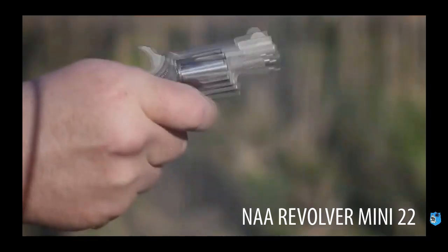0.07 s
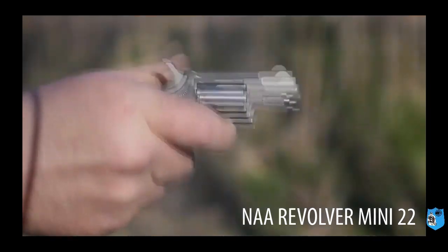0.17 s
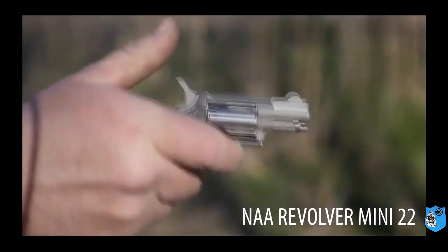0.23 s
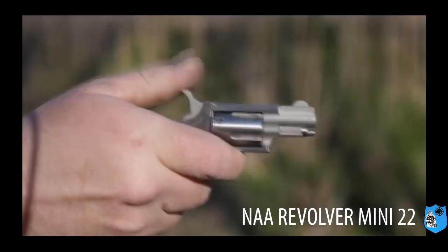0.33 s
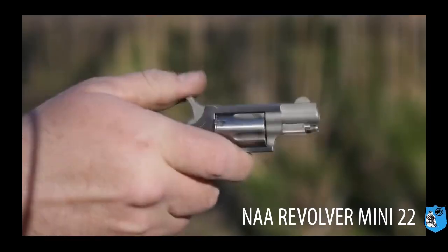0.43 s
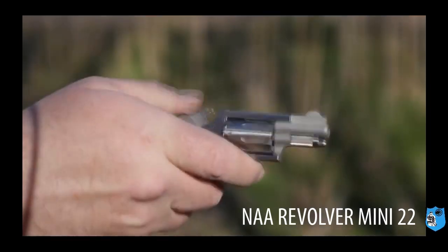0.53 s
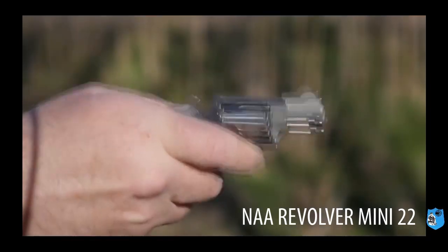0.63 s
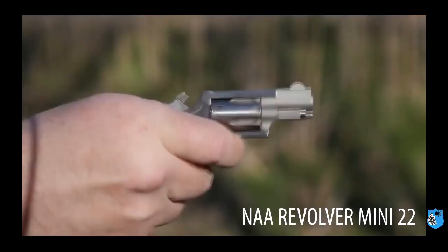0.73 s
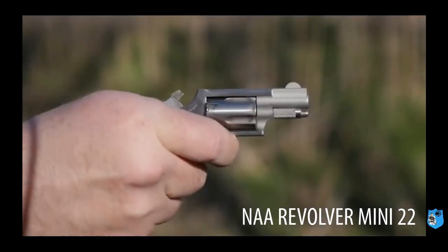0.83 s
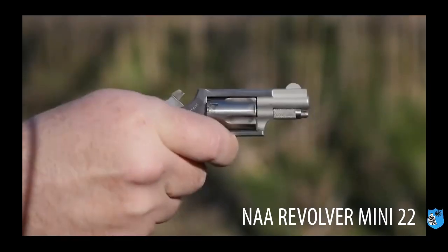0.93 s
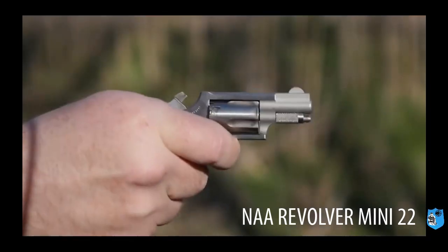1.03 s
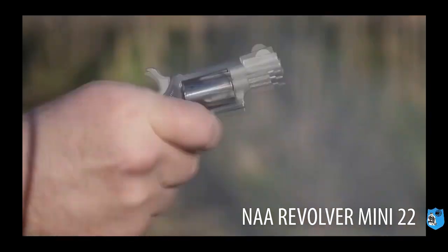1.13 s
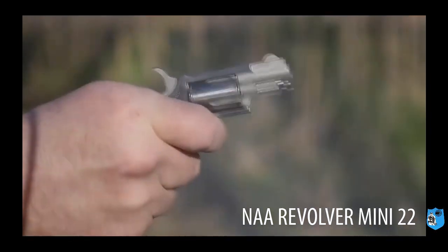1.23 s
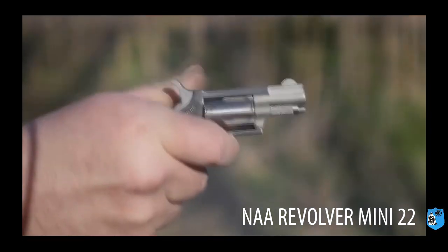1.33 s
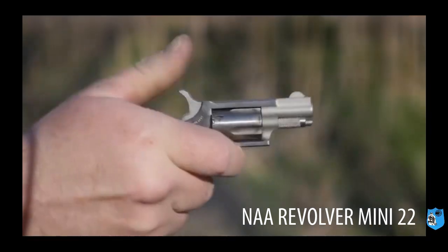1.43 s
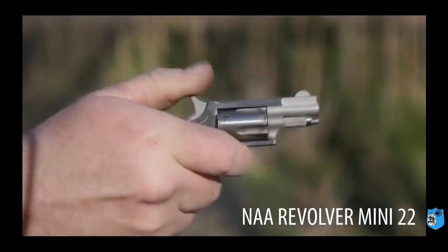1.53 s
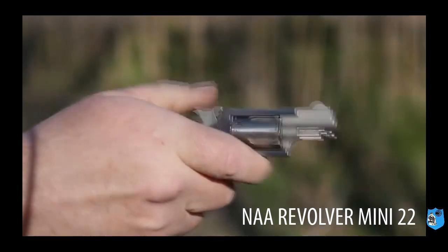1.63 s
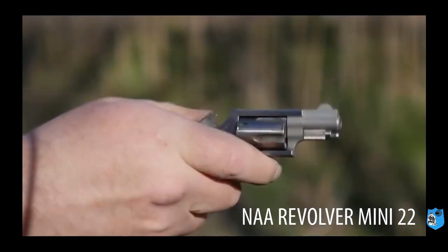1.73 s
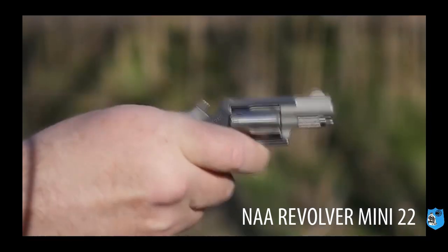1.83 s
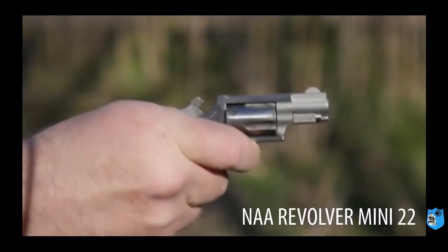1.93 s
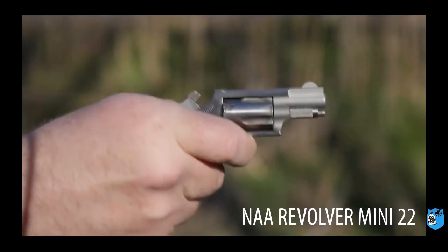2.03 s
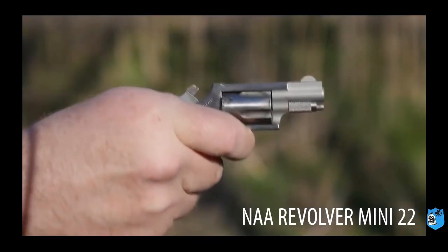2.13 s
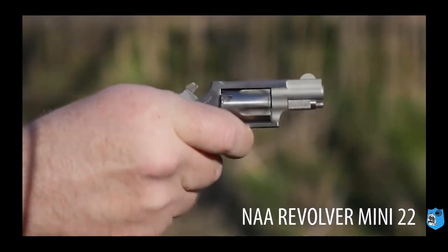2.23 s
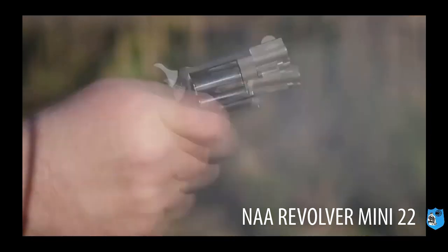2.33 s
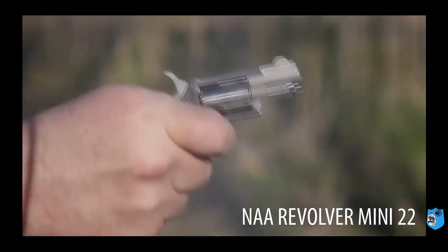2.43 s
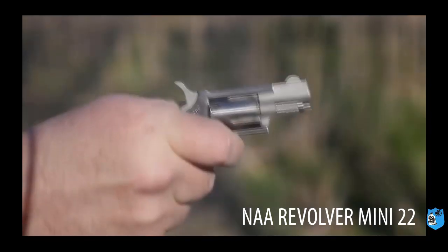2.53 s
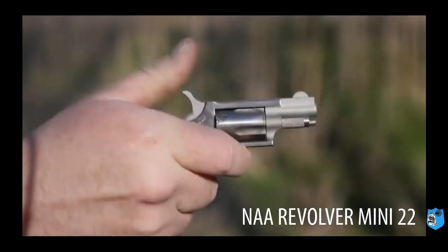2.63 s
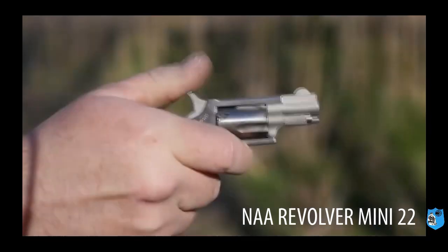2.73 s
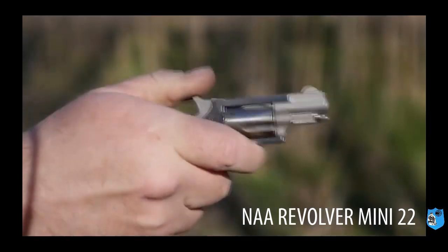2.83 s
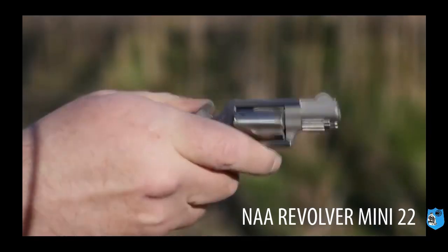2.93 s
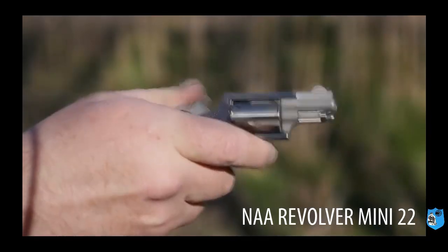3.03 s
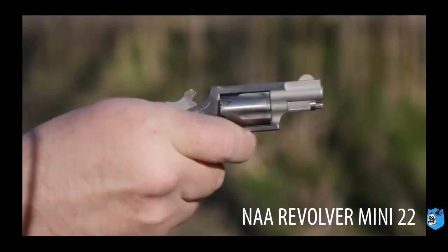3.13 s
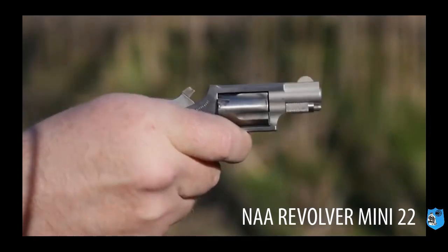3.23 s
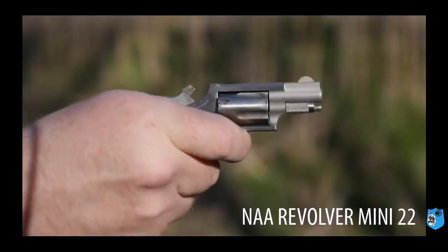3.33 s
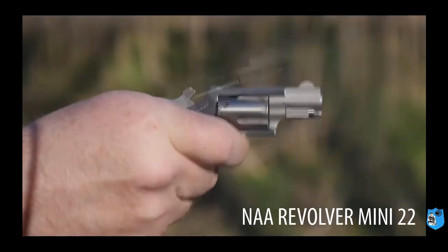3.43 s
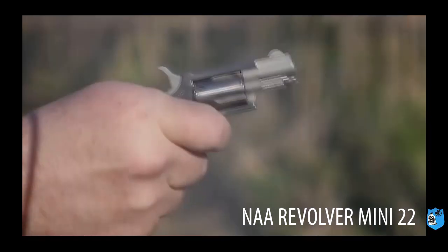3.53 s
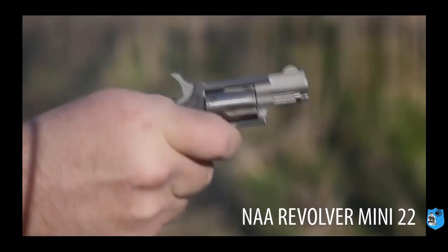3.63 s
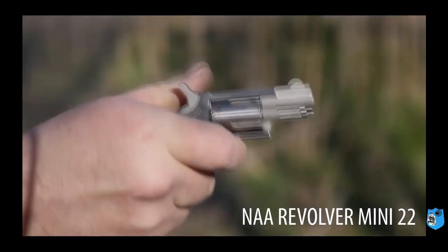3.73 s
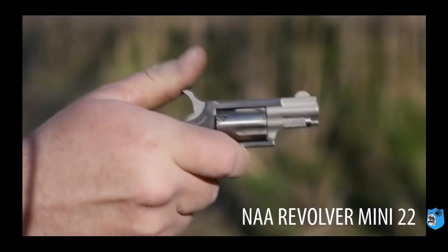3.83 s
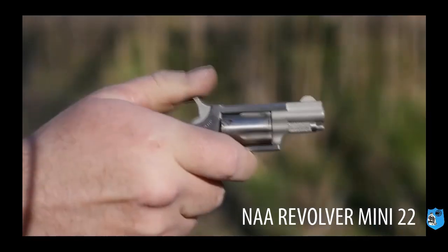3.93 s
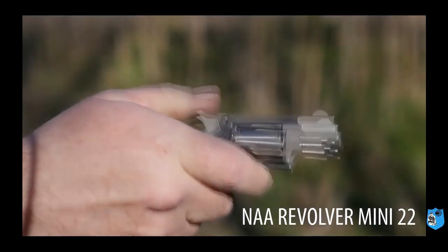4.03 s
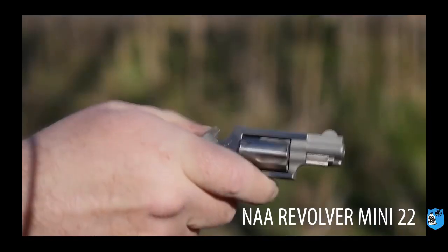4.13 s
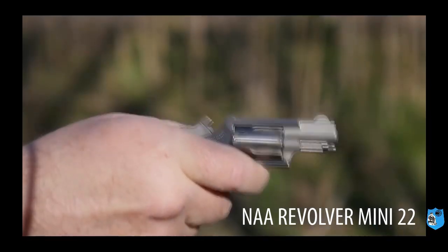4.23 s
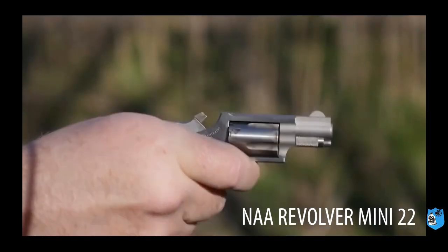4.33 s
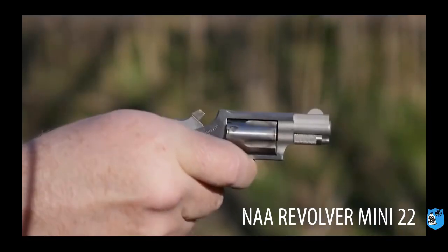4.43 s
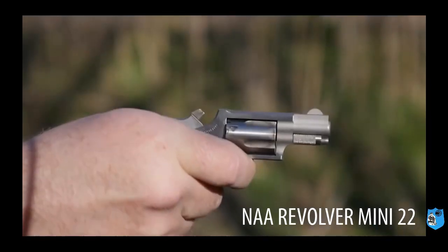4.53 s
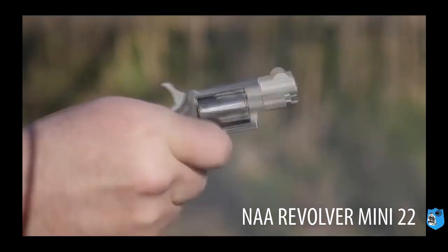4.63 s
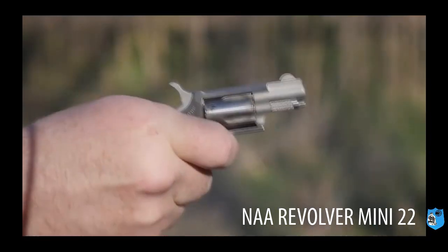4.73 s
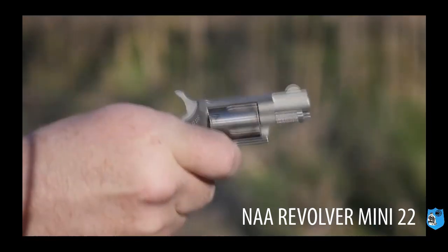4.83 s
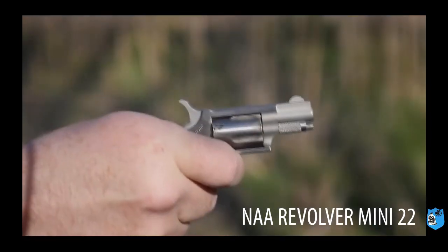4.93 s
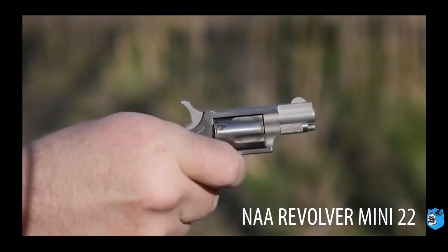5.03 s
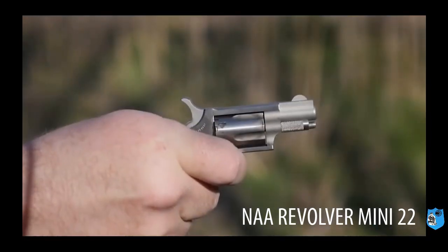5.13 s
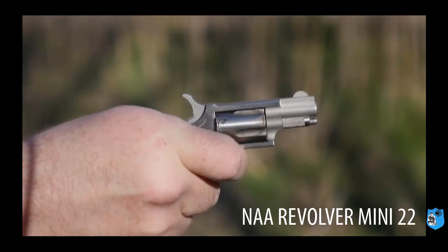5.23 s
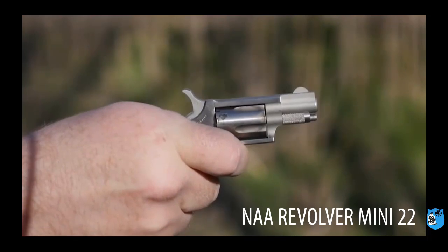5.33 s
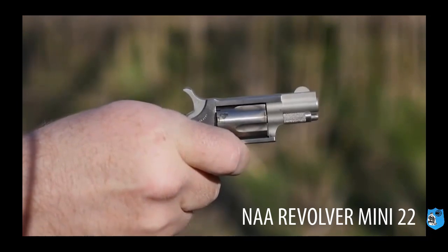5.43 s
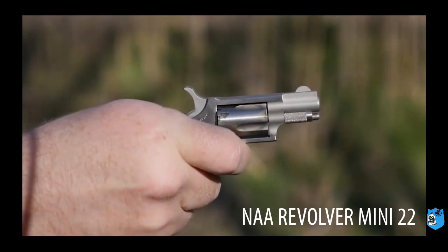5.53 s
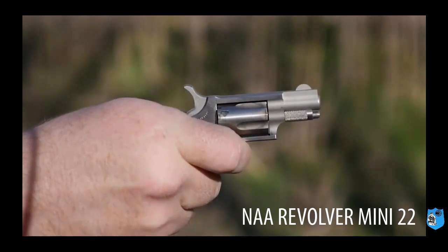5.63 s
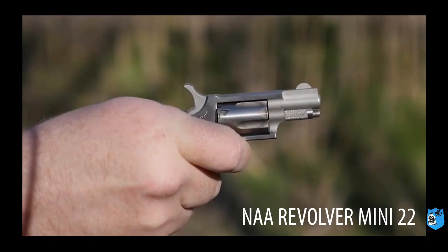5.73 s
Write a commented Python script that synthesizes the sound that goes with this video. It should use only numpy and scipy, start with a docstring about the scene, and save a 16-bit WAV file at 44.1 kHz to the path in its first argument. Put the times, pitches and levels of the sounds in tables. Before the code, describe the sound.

A small revolver is fired outdoors, very close to a stereo microphone, with trees nearby. The first shot cracks right at the start: a hard, bright, clipped snap with a brief low thump, then dense scattered echoes off brush and trunks, growing duller and fading over roughly half a second. A slightly raised hiss lies under this from 0.3 to 1.25 seconds. At 0.6 the hammer is cocked: two crisp steel clicks almost run together, with a faint settling tick at 0.73. Further shots follow at about 1.2, 2.4, 3.6 and 4.7 seconds, each with the same woodland echo. Cocking clicks come at 1.7, 3.0 and 4.1, with weak ticks at 1.9 and 4.3. After the fifth shot there is no more cocking; the echo decays into low, quiet distant air, with a barely audible high insect buzz swelling near 5.7.

```python
"""Five shots of a small single-action revolver outdoors, close to a stereo microphone, thumb-cocked in between.
Each shot: a noise burst for the hammer, then pressure pulses for the blast and its bounces, flattened by the
microphone. Shaped noise is the scatter from brush and trees, duller the further it has gone; trunks echo pulses.
Lockwork clicks are noise bursts through resonances. Distant air, a faint insect and hiss are filtered noise."""
import sys
import numpy as np
from scipy import signal
from scipy.fft import rfft, irfft
from scipy.io import wavfile

SR = 44100
rng = np.random.default_rng(int(sys.argv[2]) if len(sys.argv) > 2 else 0)


def generate_wav(sig):
    """Save sig (samples, or channels by samples) to the path in sys.argv[1] as 16-bit PCM at SR."""
    pcm = np.round(np.clip(np.atleast_2d(sig).T, -1, 1) * 32767).astype(np.int16)
    wavfile.write(sys.argv[1], SR, pcm)


N = 254718
ECHO_LENGTH = int(1.6 * SR)
TIME_S = np.arange(N) / SR
AGE_S = TIME_S[:ECHO_LENGTH]


def undb(db):
    """Decibels to gain."""
    return 10 ** (np.asarray(db) / 20)


def unit(x):
    """Scale to rms 1."""
    return x / np.sqrt(np.mean(x ** 2))


def pan(left_minus_right_db):
    """Left and right gains for a level difference."""
    return undb(np.array([[left_minus_right_db], [-left_minus_right_db]]) / 2)


def add(out, sound, start_s):
    """Mix a sound in at a time, no earlier than 0."""
    start = max(int(start_s * SR), 0)
    part = sound[..., :out.shape[-1] - start]
    out[..., start:start + part.shape[-1]] += part


def noise(size, side_db):
    """White stereo noise: a common mid plus an opposed side signal at side_db, rms 1."""
    mid, side = rng.standard_normal((2, size))
    return unit(mid + undb(side_db) * side * np.array([[1], [-1]]))


def colour(x, points):
    """Filter by (frequency [Hz], level [dB]) points; white noise keeps its power."""
    hz, db = np.transpose(points)
    f = np.fft.rfftfreq(x.shape[-1], 1 / SR)
    gain = unit(undb(np.interp(np.log(f + 1), np.log(hz), db)))
    return irfft(rfft(x) * gain, x.shape[-1])


def ring(x, hz, width_hz):
    """One resonance, gain 1 at its centre."""
    b, a = signal.iirpeak(min(hz, SR / 2 - 1), hz / width_hz, fs=SR)
    return signal.lfilter(b, a, x)


def wander(size, count):
    """Random values joined by straight lines."""
    return np.interp(np.arange(size), np.linspace(0, size, count), rng.standard_normal(count))


# spectrum of distant air: (frequency [Hz], relative density [dB per Hz])
AIR_COLOUR = [(20, -2.5), (90, 7), (200, 1), (330, 4.5), (560, 3), (1000, -9.5), (1600, -13.5),
              (2500, -31.5), (5000, -39.5)]


def distant_air():
    """Low-pitched noise whose level swells slowly."""
    level = undb(-58.5 + 1.0 * wander(N, count=24))
    return level * colour(noise(N, side_db=-6.5), AIR_COLOUR)


# swells of the buzz: (crest time [s], half length [s], level [dB])
INSECT_SWELLS = [(3.147, .3, -78.5), (4.425, 0.18, -78.5), (5.748, .4, -79.5)]
INSECT_REST_DB = -91.5


def insect():
    """A thin buzz, noise through two close resonances, that comes and goes."""
    level = undb(INSECT_REST_DB)
    for crest_s, half_s, db in INSECT_SWELLS:
        level = level + undb(db) * np.exp(-((TIME_S - crest_s) / half_s) ** 2)
    buzz = ring(ring(noise(N, side_db=-9.5), hz=7850, width_hz=450), hz=7980, width_hz=600)
    return level * unit(buzz)


# spectrum of hiss: (frequency [Hz], relative density [dB per Hz])
HISS_COLOUR = [(100, -5.5), (6000, 5), (11000, 4.5), (14800, 6.5), (15600, -1), (16200, -30)]
HISS_DB, ADDED_HISS_DB = -78, -62.5
LOUD_HISS_FROM_S, LOUD_HISS_TO_S, HISS_RAMP_S = 0.31, 1.25, .06


def hiss():
    """Steady bright noise that stands higher for one early stretch."""
    inside_s = np.minimum(TIME_S - LOUD_HISS_FROM_S, LOUD_HISS_TO_S - TIME_S)
    raised = np.clip(inside_s / HISS_RAMP_S, 0, 1)
    level = undb(HISS_DB) + undb(ADDED_HISS_DB) * raised
    return level * colour(noise(N, side_db=-15.5), HISS_COLOUR)


def background():
    """Distant air, insect and hiss together."""
    return distant_air() + insect() + hiss()


def contact():
    """A hard touch of steel on steel: a burst of micro-impacts that dies in a few milliseconds."""
    t = AGE_S[:SR // 20]
    return noise(len(t), side_db=-11.5) * np.exp(-t / 0.0012) * (1 - np.exp(-t / 0.00011))


def click(x, db):
    """Scale a click so that its energy, spread over a millisecond, has this level."""
    energy_per_channel = np.sum(x ** 2) / len(x)
    return x * undb(db) / np.sqrt(energy_per_channel / (SR / 1000))


# thumb strokes: (half-cock time [s], half to full cock [s], half-cock level [dB], full-cock level [dB])
STROKES = [(.606, .0457, -21.5, -20.5), (1.728, 0.047, -23, -21), (2.9707, .047, -22, -19.5),
           (4.137, 0.043, -24.5, -19.5)]
# thumb lets go, hammer settles on the sear: (time [s], tick level [dB], knock level [dB])
SETTLING = [(0.7322, -28.5, -29), (1.8858, -41.5, -34), (4.3039, -39, -37.5)]
# part tone: (lower pawl modes' boost [dB], frame knock [Hz], ping against knock [dB])
HALF_COCK = (1.1, 2090, -23.5)
RATCHET = (-1, 2500, -10.5)
FULL_COCK = (3.5, 2770, -21)
SETTLE = (-19.5, 2540, -12.5)
RATCHET_AFTER_S, RATCHET_DB = .03, -36
# frame knock against the tick that sets it off
HALF_KNOCK_DB, RATCHET_KNOCK_DB, FULL_KNOCK_DB = -2.5, -8.5, -2


def lock_clicks():
    """Every stroke passes half cock, turns the cylinder and ends at full cock; rows (s, tick dB, knock dB, part)."""
    clicks = [(s, tick_db, knock_db, SETTLE) for s, tick_db, knock_db in SETTLING]
    for s, stroke_s, half_db, full_db in STROKES:
        clicks += [(s, half_db, half_db + HALF_KNOCK_DB, HALF_COCK),
                   (s + RATCHET_AFTER_S, RATCHET_DB, RATCHET_DB + RATCHET_KNOCK_DB, RATCHET),
                   (s + stroke_s, full_db, full_db + FULL_KNOCK_DB, FULL_COCK)]
    return clicks


# lockwork resonances: (nominal frequency [Hz], width [Hz], relative level [dB])
PAWL_MODES = [(4550, 180, -2), (5580, 680, -1), (7930, 820, -1), (10670, 1340, 4.5), (12600, 2000, 0.5),
              (14400, 520, -6.5)]


def cocking():
    """The sear drops over its notches and the cylinder locks; the hand damps the steel at once."""
    clicks = np.zeros((2, N))
    hz, width_hz, mode_db = np.transpose(PAWL_MODES)
    lower = hz < 9000
    for s, tick_db, knock_db, (lower_db, knock_hz, ping_db) in lock_clicks():
        push = contact()
        detuned_hz = hz * (1 + 0.065 * rng.standard_normal(len(hz)))
        gains = undb(mode_db + lower_db * lower)
        tick = sum(g * ring(push, f, w) for f, w, g in zip(detuned_hz, width_hz, gains))
        knock = ring(ring(contact(), knock_hz, width_hz=860), knock_hz, width_hz=1300)
        ping = ring(ring(push, hz=3455, width_hz=48), hz=3490, width_hz=440)
        add(clicks, click(tick, tick_db) + click(knock, knock_db) + click(ping, knock_db + ping_db), s)
    # a smooth wash of hiss lingers after each click
    fade = np.exp(-1 / (.065 * SR))
    lingering = np.sqrt(signal.lfilter([1 - fade], [1, -fade], np.mean(clicks ** 2, axis=0)))
    out = clicks + undb(-20.5) * lingering * noise(N, side_db=-15)
    add(out, undb(-24.0) * clicks, .007)  # off the ground
    return out


def blast_wave(delay_s, push_s, rise_s):
    """A shock front, a short overpressure and a longer suction."""
    t = np.maximum(AGE_S - delay_s, 0)
    return (1 - np.exp(-t / rise_s)) * (1 - t / push_s) * np.exp(-t / push_s)


def absorb(x, loss_db_per_s, power, reach_s):
    """Foliage dulls sound by a loss set at 1 kHz, more in the treble; the latest sound passes over the treetops."""
    f, t, cells = signal.stft(x, SR, nperseg=256)
    loss_db = loss_db_per_s * np.minimum(t, reach_s) * (f[:, None] / 1000) ** power
    return signal.istft(cells * undb(-loss_db), SR)[1][:, :x.shape[-1]]


def stirred(pattern):
    """The scatterers stay put, but aim and moving leaves change their pattern a little."""
    return unit(pattern + .38 * noise(ECHO_LENGTH, side_db=-9))


# stands of trunks, used by both functions below:
# (delay [s], front trunk gain [dB], flurry level [dB], flurry decay [s], left minus right [dB])
TRUNKS = [(.0350, -10.5, -18.5, 0.008, -0.5), (.097, -20, -22, .005, 3), (.129, -23, -25.5, 0.016, -4),
          (.15, -12.5, -22.5, 0.039, -3), (.249, -20.5, -23.5, 0.064, -2), (.30, -22, -25.5, 0.027, -3)]


def trunk_echoes():
    """Large reflectors each return a short, dull copy of the blast."""
    out = np.zeros((2, ECHO_LENGTH))
    pulse = blast_wave(0, push_s=0.00015, rise_s=.00005)
    knock = ring(ring(pulse, hz=1020, width_hz=1300), hz=1100, width_hz=1400)
    knock = knock / np.abs(knock).max()
    for delay_s, db, _, _, pan_db in TRUNKS:
        add(out, knock * undb(db) * pan(pan_db), delay_s)
    return out


WOOD_NEAR_S, WOOD_RISE_S, WOOD_FAR_S = .02, .032, .34
WOOD_DB, WOOD_FADE_DB_PER_S = -24, 40


def wood_scatter():
    """Scatter strength by delay: rise from the near edge, hold, even fade, and a surge behind each trunk stand."""
    rise = 1 - np.exp(-np.maximum(AGE_S - WOOD_NEAR_S, 0) / WOOD_RISE_S)
    fade_db = WOOD_FADE_DB_PER_S * np.maximum(AGE_S - WOOD_FAR_S, 0)
    power = (rise * undb(WOOD_DB - fade_db)) ** 2
    for delay_s, _, db, decay_s, pan_db in TRUNKS:
        flurry = (AGE_S >= delay_s) * np.exp(-np.maximum(AGE_S - delay_s, 0) / decay_s)
        power = power + (undb(db) * pan(pan_db) * flurry) ** 2
    return np.sqrt(power)


# spectrum of tree scatter before absorption: (frequency [Hz], relative density [dB per Hz])
TREE_COLOUR = [(30, -35), (130, -26), (270, -24), (430, -4.5), (620, -1), (820, -0.5), (1080, 1.5),
               (1600, -2), (2000, -5), (2400, -10), (3500, -11.5), (6000, -21), (13000, -25.5),
               (16000, -32)]


def wood_echo(trees, trunks, strength):
    """Trunk echoes plus noise-like scatter that loses treble on its way through foliage."""
    scatter = colour(stirred(trees), TREE_COLOUR) * strength
    return trunks + absorb(scatter, loss_db_per_s=14.5, power=0.82, reach_s=0.62)


# spectrum of hammer clash, also of the gas rush: (frequency [Hz], relative density [dB per Hz])
HAMMER_COLOUR = [(300, -12.5), (2000, -12.5), (4000, -2), (6000, -8.5), (8400, 0), (9400, -8.5), (10500, 0),
                 (14300, -7.5), (16000, -12.5)]


def hammer(ring_s):
    """The hammer slams on the rim of the cartridge: a brief, bright clash of steel."""
    envelope = np.exp(-AGE_S / ring_s) * (1 - np.exp(-AGE_S / .0001))
    return colour(noise(ECHO_LENGTH, side_db=-6), HAMMER_COLOUR) * envelope


# close bounces off shooter and ground: (delay [s], level [dB], left minus right [dB])
BOUNCES = [(.0027, -8, 8.5), (.0054, -10.5, -1.5), (.0079, 2, -1), (.0090, -8, -2.5)]
# spectrum of brush scatter: (frequency [Hz], relative density [dB per Hz])
BRUSH_COLOUR = [(30, -9), (200, -7), (500, -2), (1100, 1), (2000, -5.5), (3500, -11), (8000, -14),
                (14000, -22), (16500, -30)]
GROUND_DELAY_S = .0079


def muzzle(brush):
    """The direct blast with its rush of gas, its close bounces, and scatter from the brush nearby."""
    direct = undb(15) * blast_wave(0, push_s=.00034, rise_s=.00003)
    bounces = sum(undb(db) * pan(pan_db) * blast_wave(delay_s, push_s=.00048, rise_s=.00008)
                  for delay_s, db, pan_db in BOUNCES)
    # soft ground also returns a long, low swell
    swell_fade = np.exp(-np.maximum(AGE_S - GROUND_DELAY_S, 0) / 0.0054)
    swell = undb(6.5) * blast_wave(GROUND_DELAY_S, push_s=0.0047, rise_s=0.0029) * swell_fade
    gas = undb(-1) * np.exp(-AGE_S / 0.001) * colour(noise(ECHO_LENGTH, side_db=-2), HAMMER_COLOUR)
    scatter_level = undb(-16.0) * np.exp(-AGE_S / 0.0049) + undb(-26.5) * np.exp(-AGE_S / 0.057)
    scatter = scatter_level * colour(brush, BRUSH_COLOUR)
    # twigs at the edge of the wood return only the short waves
    twig_level = undb(-39) * np.exp(-((AGE_S - .06) / 0.0098) ** 2)
    twigs = twig_level * unit(ring(brush, hz=7460, width_hz=6600))
    low_brush = ring(ring(brush, hz=30, width_hz=90), hz=50, width_hz=170)
    rumble = undb(-38.5) * np.exp(-AGE_S / 0.052) * unit(low_brush)
    return direct + bounces + swell + gas + scatter + twigs + rumble


# shots: (muzzle blast time [s], blast gain [dB], hammer lead [s], hammer gain [dB], echo gain [dB])
SHOTS = [(.0021, 1, 0.00093, -7.5, 1), (1.2156, 0.5, 0.0029, -8.5, 1), (2.428, 1.5, 0.0017, -20.5, 1),
         (3.5587, 2.5, .0023, -11.5, 0.5), (4.703, 1, 0.0027, -11.5, 0)]
SEAR_LEAD_S = .0032  # ahead of the hammer


def shots():
    """The sear slips, the hammer falls, the powder fires; all shots meet the same brush and trees."""
    out = np.zeros((2, N))
    brush = noise(ECHO_LENGTH, side_db=-3.5)
    # trees stand in clumps, so their scatter comes in lumps
    trees = noise(ECHO_LENGTH, side_db=-9.5) * undb(1.2 * wander(ECHO_LENGTH, count=300))
    trunks, strength = trunk_echoes(), wood_scatter()
    for s, blast_db, lead_s, hammer_db, echo_db in SHOTS:
        echo = wood_echo(trees, trunks, strength)
        sear = ring(hammer(ring_s=0.00073), hz=12500, width_hz=5700)
        add(out, undb(-24.5) * sear, s - lead_s - SEAR_LEAD_S)
        add(out, undb(hammer_db) * hammer(ring_s=0.0016), s - lead_s)
        add(out, undb(blast_db) * muzzle(stirred(brush)) + undb(echo_db) * echo, s)
    return out


def scene():
    """The quiet outdoors, cocking and shots."""
    return background() + cocking() + shots()


def record(dry):
    """The microphone flattens the blast peaks; the recorder blocks the deepest bass and cuts the top."""
    ceiling, knee, top_hz = .56, 4, 15900
    flattened = dry / (1 + np.abs(dry / ceiling) ** knee) ** (1 / knee)
    coupled = signal.sosfilt(signal.butter(1, 2, "high", fs=SR, output="sos"), flattened)
    return signal.sosfiltfilt(signal.ellip(8, .1, 60, top_hz, fs=SR, output="sos"), coupled)


dry = scene()
out = record(dry)
generate_wav(out)
```